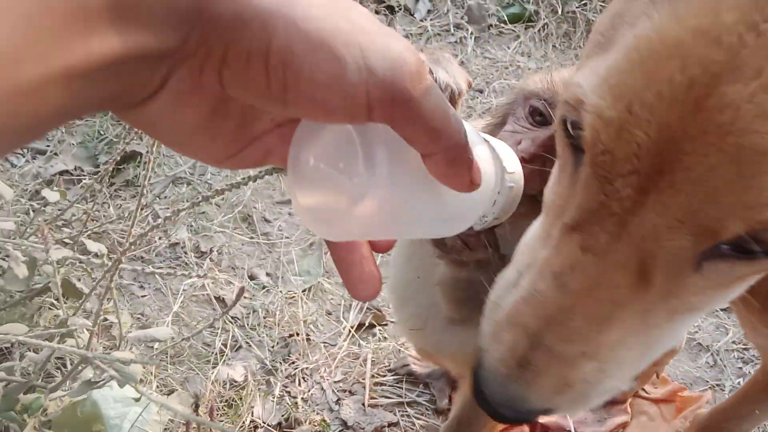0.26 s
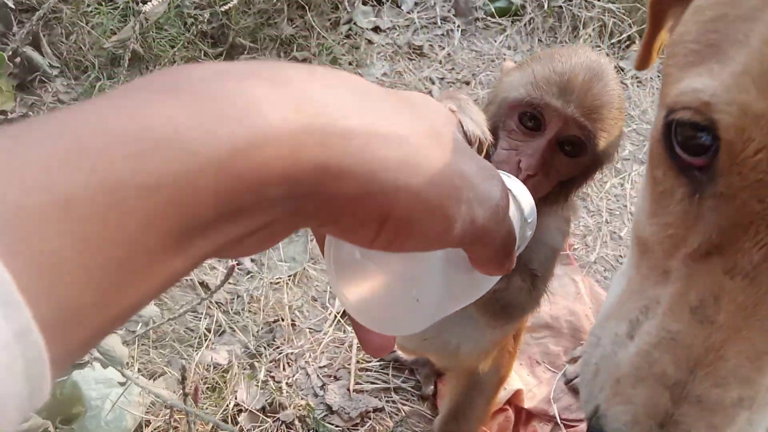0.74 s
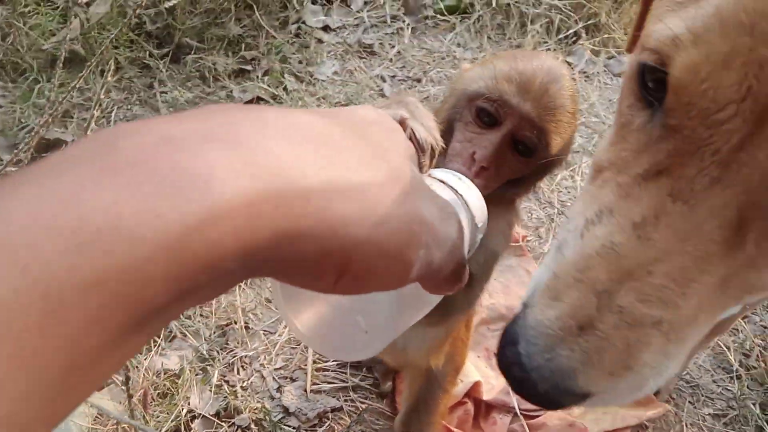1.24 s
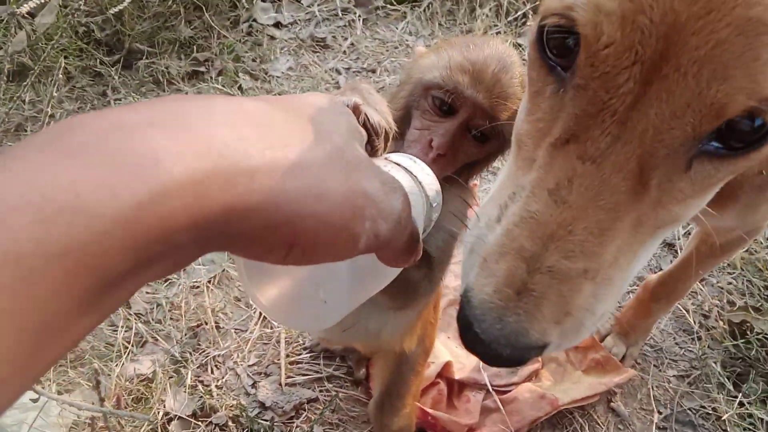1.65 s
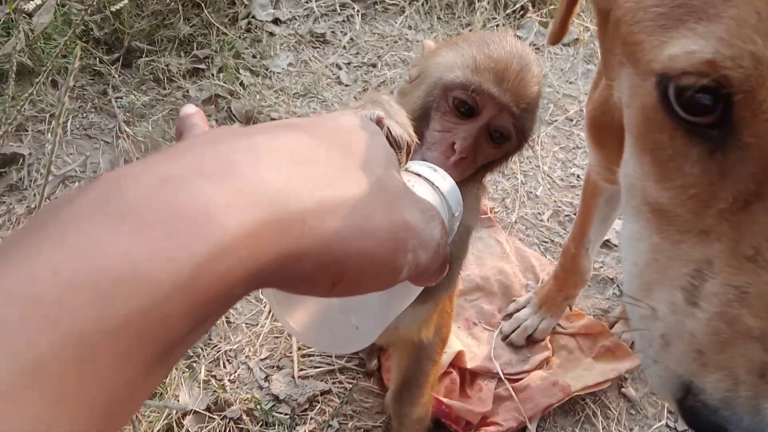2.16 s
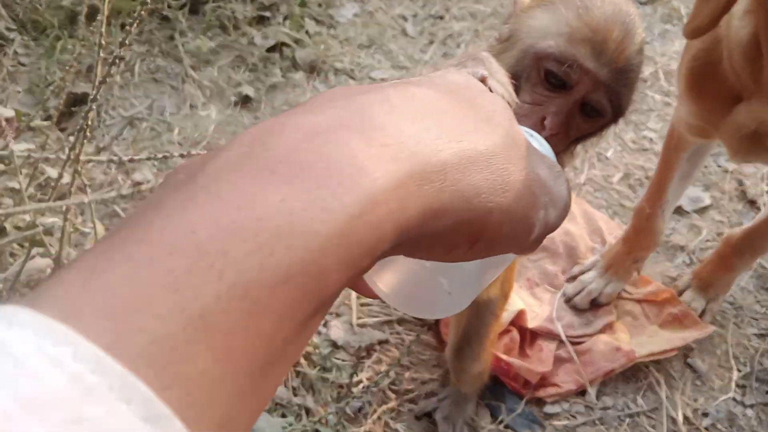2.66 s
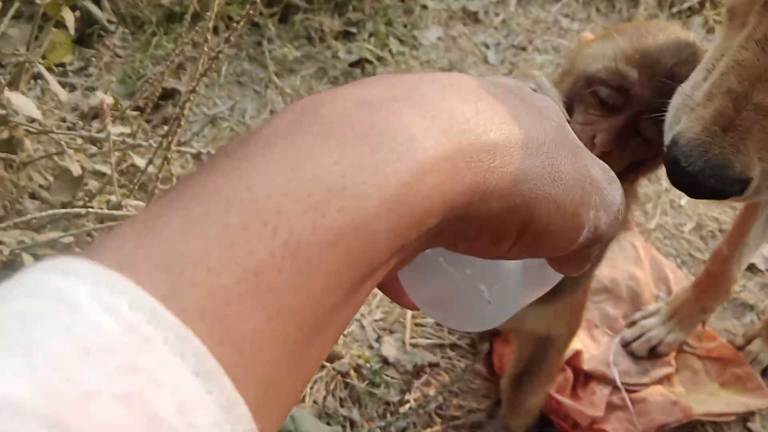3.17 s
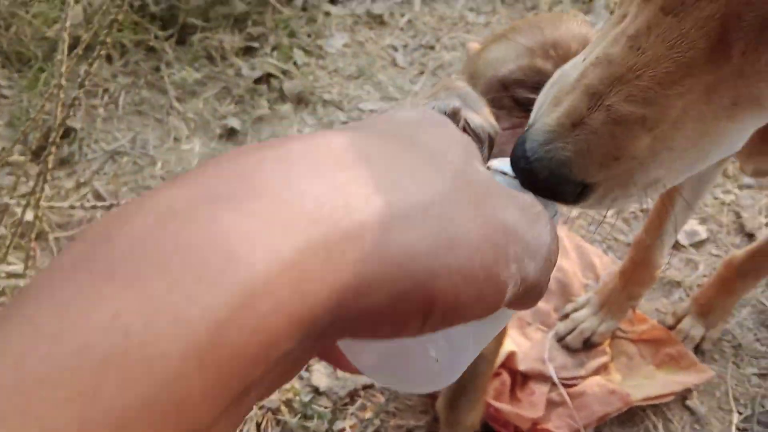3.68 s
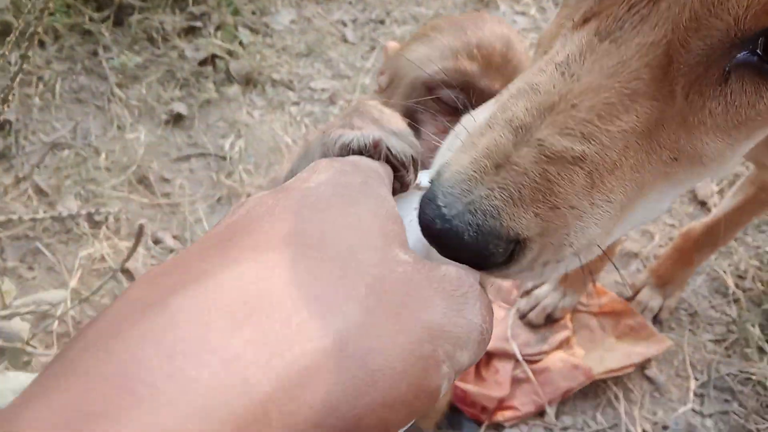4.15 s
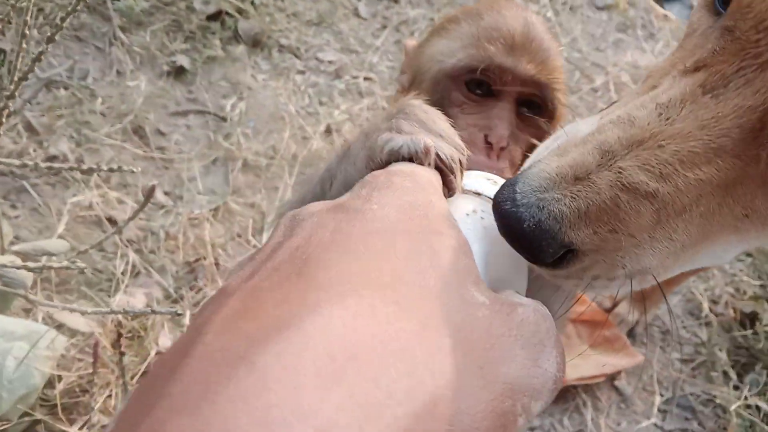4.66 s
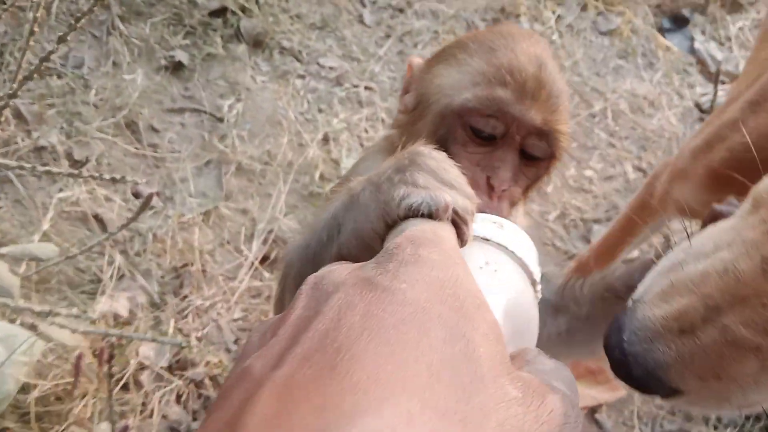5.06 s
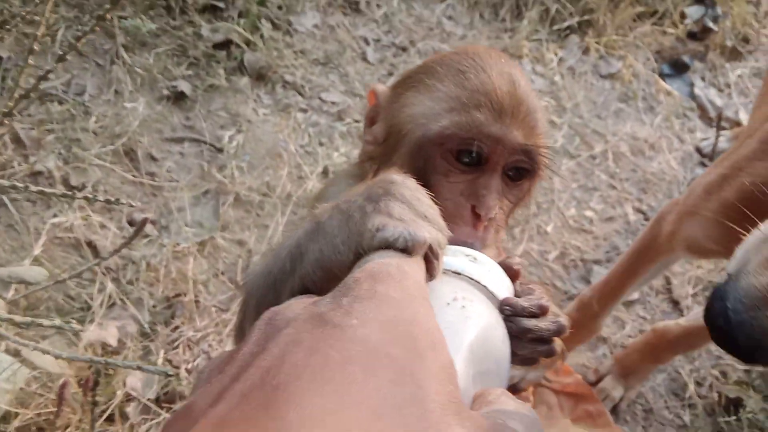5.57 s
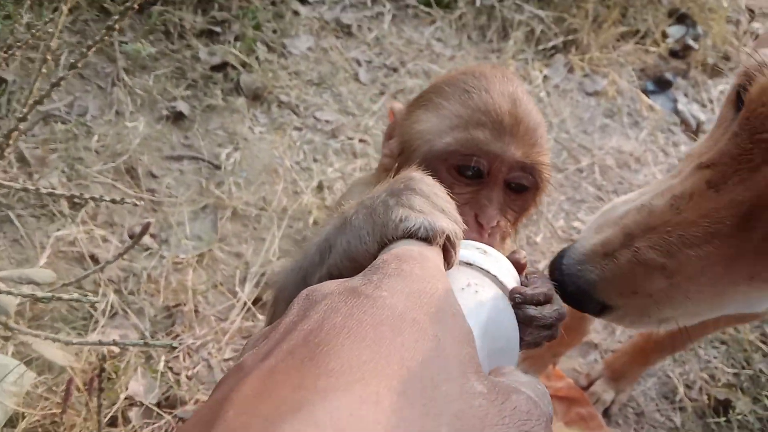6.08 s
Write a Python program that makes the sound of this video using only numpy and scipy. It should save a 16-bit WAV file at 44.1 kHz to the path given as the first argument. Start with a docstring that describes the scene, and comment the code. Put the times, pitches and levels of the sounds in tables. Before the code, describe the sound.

Rasping, chirping birds call over each other in a quiet rural yard as a young monkey and dog nuzzle a bottle with faint clicks and smacks.

```python
"""Rasping chatter and a hissing scold come first: small birds squabble in bushes round a quiet farmyard.
Fluttering tones make the rasps, swinging tones the warbles, sliding tones the whistles, noise the scolds.
Far off, blurred chirps, noise and a thin whine swell and sink over quiet air and insects.
Close by, a young monkey and a dog nuzzle a plastic bottle: short ringing bursts of noise tick and smack."""
import sys
import numpy as np
from scipy import signal
from scipy.io import wavfile

SR = 44100
rng = np.random.default_rng(int(sys.argv[2]) if len(sys.argv) > 2 else 0)


def log_audio(samples):
    """Write samples as a 16-bit WAV file to the path given in sys.argv[1]."""
    # one column per channel
    frames = np.atleast_2d(samples).T
    # limit to full scale, then quantise
    limited = np.clip(frames, -1, 1)
    pcm = np.round(limited * 32767).astype(np.int16)
    wavfile.write(sys.argv[1], SR, pcm)


N = 278698
TIME = np.arange(N) / SR

# shared by several kinds of call
ATTACK_S, ATTACK_SHARE, RELEASE_S = 0.0024, 0.042, .005   # opening also takes this share of the call's length
FLUTTER_JITTER = 0.25   # unevenness of the flutter rate, as a share
CALL_ARCH = .035   # the ends of a rasp or scold lie this share of the pitch lower


def from_db(db):
    """Turn decibels into a plain multiplier."""
    return np.exp(np.asarray(db) * (np.log(10) / 20))


def rms_one(x):
    """Scale a sound to an rms (average strength) of 1."""
    return x / np.sqrt(np.mean(x ** 2) + 1e-20)


def in_time(rows):
    """Each column of a curve, at every sample."""
    s, *columns = np.transpose(rows)
    return [np.interp(TIME, s, c) for c in columns]


def add(out, start, sound):
    """Mix a sound in at a time; what falls outside is lost."""
    at = int(round(start * SR))
    first, last = max(at, 0), min(at + len(sound), N)
    if last > first:
        out[first:last] += sound[first - at:last - at]


def wander(rate, count):
    """A random curve joining `rate` new chance values a second by straight lines; spread about 1."""
    position = np.arange(count) * (rate / SR)
    return 1.22 * np.interp(position, np.arange(4096), rng.standard_normal(4096))


def turns(hz):
    """The phase of an oscillator that follows a pitch curve."""
    return 2 * np.pi * np.cumsum(hz) / SR


def glide(count, first, middle, last):
    """A smooth pitch arc through three points."""
    return np.polyval(np.polyfit([0, .5, 1], [first, middle, last], 2), np.linspace(0, 1, count))


def slide(count, hz, slide_hz, arch):
    """A pitch that slides through `hz`, with both ends lowered by the share `arch`."""
    ends = hz * (1 - arch)
    return glide(count, ends - slide_hz / 2, hz, ends + slide_hz / 2)


def swell(count, loudest, edge_db):
    """A call opens within milliseconds, grows to its loudest point, fades and closes."""
    u, length = np.linspace(0, 1, count), count / SR
    attack = ATTACK_S + ATTACK_SHARE * length
    opening = np.clip(np.minimum(u / attack, (1 - u) / RELEASE_S) * length, 0, 1)
    peak = np.clip(loudest, .05, .95)
    return opening * from_db(np.interp(u, [0, peak, 1], [edge_db, 0, edge_db]))


def resonate(x, hz, width_hz):
    """A resonance, which lets through the sound round one pitch, with gain 1 on top."""
    r = np.exp(-np.pi * width_hz / SR)
    feedback = [1, -2 * r * np.cos(2 * np.pi * hz / SR), r * r]
    return signal.lfilter(np.array([1, 0, -1]) * (1 - r * r) / 2, feedback, x)


def resonate_twice(x, hz, width_hz):
    """The same resonance two times over, for steeper sides."""
    return resonate(resonate(x, hz, width_hz), hz, width_hz)


def low_pass(x, hz, order=2):
    """Take away the treble above a pitch."""
    return signal.sosfilt(signal.butter(order, min(hz, SR / 2 - 1), fs=SR, output="sos"), x)


def banded_noise(spectrum, patchy_db, rate):
    """Third-octave bands of noise, each swelling and sinking by itself; rms 1."""
    out, edges = 0, 25 * 2 ** (np.arange(29) / 3)
    white, (hz, db) = rng.standard_normal((2, N)), np.transpose(spectrum)
    for k, (low, high) in enumerate(zip(edges, edges[1:])):
        if high > hz[0] and low < hz[-1]:
            level = np.interp(np.log(low * high) / 2, np.log(hz), db)
            band_filter = signal.butter(3, [low, high], "band", fs=SR, output="sos")
            band = signal.sosfilt(band_filter, white[k % 2])   # neighbours use different noise
            out = out + band * from_db(level + patchy_db * wander(rate, N))
    return rms_one(out)


def yard(x, t60, echo_db):
    """The ground returns one quick echo; leaves, trunks and walls scatter a thin, dull tail."""
    t = TIME[:SR]
    sparse = rng.standard_normal(SR) * (rng.random(SR) < .06)
    echoes = low_pass(sparse * from_db(-60 * t / t60) * (t > .004), 7700)   # t60: seconds to fade 60 dB
    ground = 0.17 * np.interp(TIME - .0034, TIME, x, left=0)
    tail = signal.fftconvolve(x, echoes / np.linalg.norm(echoes))[:N]
    return x + ground + from_db(echo_db) * tail


# tone colour of the air: (pitch [Hz], relative level per Hz [dB])
AIR_SPECTRUM = [(25, -26), (45, -12.5), (65, 0), (130, -1.5), (230, -9), (340, -6), (520, -14), (900, -12),
                (1600, -10), (3000, -15.5), (4500, -40)]
# faint shrill insect bands: (pitch [Hz], relative level [dB])
INSECT_BANDS = [(5520, -4.5), (6080, 0), (7020, -5.5)]
TOP_HISS_HZ, TOP_HISS_WIDTH_HZ, TOP_HISS_DB = 15500, 1300, -91   # a thin, steady hiss at the very top


def stillness():
    """Noise shaped into low, uneven air, steady far insects and very faint hiss."""
    air = from_db(-67.5) * banded_noise(AIR_SPECTRUM, patchy_db=5.0, rate=20)
    white = rng.standard_normal((2, N))
    insects = rms_one(sum(from_db(db) * resonate_twice(white[0], hz, 380) for hz, db in INSECT_BANDS))
    top = rms_one(resonate_twice(white[0], TOP_HISS_HZ, TOP_HISS_WIDTH_HZ))
    return air + from_db(-79.5) * insects + from_db(-89.0) * white[1] + from_db(TOP_HISS_DB) * top


def far_chirps(count):
    """Many small arcs at random pitches and moments, each with a weak octave; rms 1."""
    out = np.zeros(N)
    for when, size, height, slope, strength in rng.random((count, 5)):
        length = int((.04 + .09 * size) * SR)
        hz = 2250 + 1900 * height ** 1.5
        arc = glide(length, hz * (.92 + .2 * slope), hz, hz * .96)
        phase = turns(arc * (1 + .012 * wander(500, length)))
        tone = np.sin(phase) + .15 * np.sin(2 * phase)
        add(out, when * N / SR, from_db(6 * strength) * swell(length, .4, edge_db=-10) * tone)
    return rms_one(low_pass(out, 6500, order=8))


def blurred_tone(hz, width_hz):
    """A tone that drifts a little and fades in and out on its long path; rms 1."""
    fading = wander(width_hz, N) + 1j * wander(width_hz, N)
    phase = turns(hz * (1 + .011 * wander(9, N)))
    return rms_one(np.real(fading * np.exp(1j * phase)))


# loudness of the far flock, before the trims below: (time [s], chatter level [dB], hiss level [dB])
FLOCK_LEVELS = [(0.0, -44, -36), (0.21, -54.5, -81), (0.46, -56.5, -53), (0.63, -49.5, -47),
                (.8, -52.5, -59), (1.07, -54, -49), (1.23, -53, -63), (1.49, -66.5, -57.5),
                (2.16, -65, -77), (2.31, -52, -74), (2.46, -75, -75.5), (2.72, -63, -58.5),
                (2.94, -56.5, -47.5), (3.13, -58, -54), (3.7, -62, -69), (4.03, -61.5, -52.5),
                (4.66, -54, -81), (5.3, -55, -50), (5.72, -46.5, -43), (6.12, -54, -50), (6.32, -50, -46)]
CHATTER_DB, HISS_DB = -3, -8   # trims of its two layers
# tone colours of the flock's chatter and hiss: (pitch [Hz], relative level per Hz [dB])
CHATTER_SPECTRUM = [(900, -40.5), (1500, -8.5), (1850, 5.5), (2300, 6), (3000, 3.5), (3700, -9), (4600, 3),
                    (7000, -54.5)]
HISS_SPECTRUM = [(2700, -11), (3900, 17.5), (4700, 2), (5600, -0.5), (6300, -9), (7200, -30), (8200, -29)]
# line of the distant whine: (time [s], level [dB])
WHINE_LEVELS = [(0.0, -72.5), (0.45, -65.5), (0.58, -71), (0.84, -63.5), (1.28, -73.5), (1.94, -76.5),
                (3.2, -71.5), (3.7, -62), (4.1, -61), (4.9, -62), (5.12, -72.5), (6.32, -62.5)]
WHINE_HZ, WHINE_SKIRT_HZ = 1254.5, 1378   # its line, and the blur above it
WHINE_EVEN_DB = -51   # level at which line and blur would be equal
# faint calls from afar: (start [s], length [s], pitch [Hz], slide [Hz], middle level [dB])
FAR_CALL_NOTES = [(0.047, 0.57, 681, -10.5, -71), (1.231, 0.4, 299.4, -120, -68.5),
                  (1.758, 0.45, 898, -38, -71.5), (2.598, 0.27, 1054, -89, -68.5),
                  (4.181, 1, 314.3, -4.5, -70.5), (5.115, 0.28, 783, 71, -73.5)]


def distance():
    """The far flock, blurred by echoes, a wavering whine and a few long, faint calls."""
    chatter_db, hiss_db = in_time(FLOCK_LEVELS)
    blur = banded_noise(CHATTER_SPECTRUM, patchy_db=2, rate=25)
    chirps = rms_one(yard(far_chirps(count=170), t60=.5, echo_db=-3))
    out = from_db(chatter_db + CHATTER_DB) * (.6 * blur + .75 * chirps)
    out += from_db(hiss_db + HISS_DB) * banded_noise(HISS_SPECTRUM, patchy_db=2.2, rate=30)
    whine = from_db(in_time(WHINE_LEVELS)[0])
    skirt = whine / from_db(WHINE_EVEN_DB)   # the whine broadens upwards as it swells
    out += whine * (blurred_tone(WHINE_HZ, 140) + skirt * blurred_tone(WHINE_SKIRT_HZ, 220))
    for start, length, hz, slide_hz, db in FAR_CALL_NOTES:
        count = int(length * SR)
        tone = np.sin(turns(slide(count, hz, slide_hz, 0) * (1 + .025 * wander(120, count))))
        add(out, start, from_db(db + 3 * wander(40, count)) * np.hanning(count) ** .5 * tone)
    return out


# dry grass and the plastic bottle tick: (time [s], peak level [dB], ring pitch [Hz])
TICK_EVENTS = [(0.3172, -55.5, 8040), (0.4215, -45, 5200), (1.1246, -40, 4940), (1.815, -40, 3250),
               (2.186, -40.5, 4560), (2.735, -51, 4870), (3.94, -62, 8940), (4.5463, -54, 10600),
               (5.512, -53.5, 7640)]
TICK_WIDTH = 0.32   # width of the ring as a share of its pitch
# wet smacks: (time [s], peak level before a lift of 4.5 dB [dB], mouth resonance [Hz])
SMACK_EVENTS = [(0.065, -51, 1240), (0.974, -55.5, 383), (1.138, -59, 1056), (2.183, -48.5, 1280),
                (3.335, -59, 1010), (3.977, -51, 840), (4.514, -50.5, 1154), (4.787, -59.5, 323),
                (5.512, -58, 1170), (5.692, -53, 1130)]
# dry grass shifts: (time of the peak [s], middle level [dB])
RUSTLE_EVENTS = [(2.88, -72), (5.351, -79.5), (6.18, -65.5)]
RUSTLE_RISE_DB_PER_S, RUSTLE_FALL_DB_PER_S = 147, 59
# tone colour of the grass: (pitch [Hz], relative level per Hz [dB])
GRASS_SPECTRUM = [(4000, -2.5), (6000, -12.5), (7800, 16.5), (9500, -11.5), (11500, -18)]


def feeding():
    """Sharp ticks of plastic and straw, smacks ringing in a mouth, and dry grass shifting underfoot."""
    out, t = np.zeros(N), TIME[:SR // 10]
    for s, db, hz in TICK_EVENTS:
        crack = rng.standard_normal(len(t)) * np.exp(-t / 0.0048)
        tick = resonate_twice(crack, hz, TICK_WIDTH * hz)
        add(out, s, from_db(db) * tick / np.abs(tick).max())
    for s, db, hz in SMACK_EVENTS:
        burst = rng.standard_normal(len(t)) * np.exp(-t / 0.014)
        smack = low_pass(resonate(burst, hz, 110), 2700)
        add(out, s, from_db(db + 4.5) * smack / np.abs(smack).max())
    shifts = 0
    for s, db in RUSTLE_EVENTS:
        below_peak_db = np.maximum(RUSTLE_RISE_DB_PER_S * (s - TIME), RUSTLE_FALL_DB_PER_S * (TIME - s))
        shifts = shifts + from_db(db - below_peak_db)
    stirring = shifts * from_db(2.0 * wander(370, N))
    return out + stirring * banded_noise(GRASS_SPECTRUM, patchy_db=3.0, rate=30)


# hissing scolds: (start [s], length [s], centre [Hz], slide [Hz], width [Hz], level [dB])
SCOLD_CALLS = [(-.1, 0.43, 4197, -200, 1130, -58), (0.569, 0.11, 5400, 5, 1190, -54),
               (0.86, 0.032, 5220, -700, 400, -57.5), (0.906, 0.064, 5820, 1588, 506, -59.5),
               (1.035, 0.14, 5340, -7, 650, -53.5), (1.775, 0.18, 4300, -200, 700, -63),
               (2.728, 0.13, 5160, -300, 1860, -55), (2.791, 0.26, 3670, 454, 1220, -50.5),
               (3.018, 0.14, 4040, -100, 895, -55), (4.193, 0.059, 5220, 4, 705, -59),
               (4.267, .07, 5750, 1203.5, 653, -52.5), (4.332, 0.053, 5760, -900, 650, -57.5),
               (4.463, 0.08, 5280, -500, 503, -61), (5.309, 0.069, 4930, 392, 500, -51.5),
               (5.236, 0.32, 3964, 100, 1220, -53), (4.741, 0.057, 6140, 5, 350, -62.5)]
SCOLD_LOUDEST, SCOLD_FLUTTER_HZ, SCOLD_CHOP = 0.36, 277.8, 0.62   # loudest point 0-1; flutter rate, depth 0-1


def scolds():
    """Toneless, fluttering hisses in one resonance that slides as the beak opens or closes."""
    out = np.zeros(N)
    for start, length, hz, slide_hz, width_hz, db in SCOLD_CALLS:
        count = int(length * SR)
        jet = low_pass(rng.standard_normal((2, SR)), width_hz / 2)[:, -count:]
        phase = turns(slide(count, hz, slide_hz, CALL_ARCH))
        flutter = turns(SCOLD_FLUTTER_HZ * (1 + FLUTTER_JITTER * wander(SCOLD_FLUTTER_HZ, count)))
        gate = 1 + SCOLD_CHOP * np.cos(flutter)
        # two slow noises on a cosine and a sine make a band of noise round the sliding centre
        hiss = rms_one(gate * (jet[0] * np.cos(phase) + jet[1] * np.sin(phase)))
        add(out, start, from_db(db) * swell(count, SCOLD_LOUDEST, edge_db=-4.0) * hiss)
    return out


# whistles: (start [s], length [s], pitch [Hz], slide [Hz], level [dB], remoteness [0-1])
WHISTLE_CALLS = [ (2.081, 0.1, 3710, 60.5, -61, 1), (2.335, 0.013, 3550, 54, -47, 0.2),
                 (2.443, 0.036, 2358, -480, -45, 0), (2.855, 0.16, 2913, -6.5, -51, 0.16),
                 (3.328, 0.21, 3737, -58, -59.5, 0.92), (3.356, 0.085, 5880, -250, -72, 1),
                 (3.822, 0.12, 4350, -86.5, -62.5, 0.9), (3.439, 0.091, 2296, -250, -44, 0.22),
                 (3.747, 0.083, 3244, -620, -52.5, 1), (3.822, 0.15, 2911, -160, -47.5, 0.72),
                 (4.501, 0.022, 2450, -300, -38, 0.03), (4.519, 0.074, 2248, -300, -53, 0.35),
                 (4.598, 0.13, 3863, -37, -59, 0.5), (4.858, 0.041, 3523, 28, -40.5, 0.2),
                 (4.901, 0.092, 3394, -62, -45, 0.7), (4.99, 0.35, 3470, -2, -59.5, 0.9)]
# overtone of a whistle, against its main tone: (pitch of the whistle [Hz], level [dB])
OCTAVE_LEVELS = [(2400, -39.5), (2900, -16), (3600, -23)]
WHISTLE_SAG, WHISTLE_LOUDEST = 0.008, 0.32   # both ends lie this share higher; loudest point 0-1
WHISTLE_WAVER, WHISTLE_FLICKER_DB = 0.028, -1   # most remote: pitch waver (share), change of level flicker


def whistles():
    """Steady blowing gives a nearly pure gliding note; with remoteness its pitch wavers and it echoes more."""
    near, far = np.zeros((2, N))
    for start, length, hz, slide_hz, db, remote in WHISTLE_CALLS:
        count, remote = int(length * SR), np.clip(remote, 0, 1)
        waver = 1 + remote * WHISTLE_WAVER * wander(492.7, count)
        phase = turns(slide(count, hz, slide_hz, -WHISTLE_SAG) * waver)
        octave_db = np.interp(hz, *np.transpose(OCTAVE_LEVELS))
        flicker = from_db((2.5 + remote * WHISTLE_FLICKER_DB) * wander(147, count))
        tone = (np.sin(phase) + from_db(octave_db) * np.sin(2 * phase)) * flicker
        note = from_db(db) * swell(count, WHISTLE_LOUDEST, edge_db=-2.0) * rms_one(tone)
        add(near, start, (1 - remote) * note)
        add(far, start, remote * note)
    return near, far


# warbles: (start [s], length [s], pitch [Hz], slide [Hz], level [dB],
#           swings a second [Hz], swing [Hz], cracked side tones [dB])
WARBLE_CALLS = [(0.389, 0.046, 4640, 895, -52, 330, 300, -28),
                (0.449, 0.11, 3940, -480, -46, 180, 150, -18.5),
                (1.072, 0.083, 2252, -82, -46.5, 77, 129, -23.5),
                (1.736, 0.061, 2482, -250, -40, 118, 200, -28), (2.197, 0.089, 2636, 4, -48, 109, 210, -10),
                (2.342, 0.042, 2557, 0, -45.5, 104, 90, -20),
                (2.391, .055, 2620, 50, -49.5, 81.4, 149, -24),
                (5.637, 0.07, 3396, 189, -45.5, 54, 417, -19),
                (5.697, 0.086, 3570, -150, -43.5, 98, 230, -15)]
WARBLE_ARCH, WARBLE_LOUDEST = 0.0305, .62   # both ends lie this share lower; loudest point 0-1
WARBLE_THROB = 0.16   # share by which each upswing fades
WARBLE_LOWER_DB = -1.5   # of the two cracked side tones, the lower against the upper


def warbles():
    """The pitch swings fast round an arc and fades on upswings; cracks add tones at 0.5 and 1.5 times it."""
    out = np.zeros(N)
    for start, length, hz, slide_hz, db, rate, swing_hz, cracked_db in WARBLE_CALLS:
        count = int(length * SR)
        swing = np.cos(turns(rate * (1 + 0.084 * wander(rate, count))))
        arc = slide(count, hz, slide_hz, WARBLE_ARCH) * (1 + 0.018 * wander(893, count))
        phase = turns(arc + swing_hz * swing)
        cracks = np.sin(phase + phase / 2) + from_db(WARBLE_LOWER_DB) * np.sin(phase / 2)
        cracks = cracks * (1 + 0.33 * wander(700, count))
        tone = (1 - WARBLE_THROB * swing) * (np.sin(phase) + from_db(cracked_db) * cracks)
        add(out, start, from_db(db) * swell(count, WARBLE_LOUDEST, edge_db=-3) * rms_one(tone))
    return out


# rasping calls: (start [s], length [s], pitch [Hz], slide [Hz], tone level [dB],
#                 harshness against the tone, before the trims below [dB], loudest point [0-1])
RASP_CALLS = [ (-.04, 0.12, 2420, -280, -44.5, -9, 0.4), (-.03, 0.11, 4000, -200, -42.5, -10.5, 0.6),
              (0.415, 0.062, 2610, -150, -53, 3.5, 0), (0.555, 0.16, 2907, -150, -43, -4, 0.61),
              (0.703, 0.031, 2274, 501, -45, -7, 0.8), (0.724, 0.038, 3244, 611, -42.5, -18, 0.3),
              (0.788, 0.034, 2750, -350, -45.5, -15, 0.4), (0.841, 0.043, 2980, -350, -37, -36, 1),
              (0.881, 0.017, 2854, -200, -43, -27, 0.2), (0.897, 0.029, 3250, 700, -44.5, -18.5, 0.6),
              (.942, 0.12, 3166, 334, -55, -4.5, 0.5), (1.005, 0.079, 1790, 598, -55.5, 1.5, 0.77),
              (1.06, 0.086, 3140, -100, -48.5, -14, 0.4), (1.149, 0.03, 2840, -250, -39, -16.5, 0.4),
              (1.167, 0.027, 2750, -200, -49.5, -20, 0.2), (1.191, 0.029, 3005, 805, -51, 1, 0.2),
              (1.376, 0.028, 2710, -300, -50.5, -8, 0.4), (1.694, 0.099, 2565, -59, -47, 3, 0.26),
              (1.715, 0.082, 3560, -60, -49.5, -31, 0.7), (2.175, 0.124, 2602, 50, -49.5, 1, 0),
              (2.391, 0.073, 3280, -200, -56.5, -31.5, 0.9), (2.746, 0.077, 2422, 436, -44, -5, 0.8),
              (2.791, 0.087, 2545, -150, -41.5, -11.5, 0.3), (3.34, 0.027, 2554, -100, -53, -3.5, .6),
              (3.421, 0.021, 2580, -310, -48.5, -12, 0.3), (3.859, 0.026, 2370, -350, -48.5, -30, .25),
              (3.91, 0.036, 2440, -380, -49.5, -5, 0.2), (4.175, 0.072, 2796, 251, -47, -12, 0.37),
              (4.233, 0.0538, 2836, 363, -45.5, -7.5, 0), (4.36, .043, 2760, -200, -42, -14, 0.4),
              (4.405, 0.062, 2555, -450, -49.5, -6, 0.4), (4.492, 0.025, 2846, -400, -44, -17, 0.3),
              (4.725, 0.087, 2440, -100, -47, -2, 0.47), (4.801, 0.047, 2680, -550, -43.5, -10.5, 0),
              (4.902, 0.11, 2893, -550, -44.5, -22, 0.4), (4.963, 0.066, 4150, -1200, -47.5, -16, 0.6),
              (5.309, 0.12, 2528, 119, -45.5, -17, 1), (5.787, 0.054, 2620, -700, -47, -13, 0.4),
              (5.852, 0.12, 2337, 236, -44.5, -5.5, 0.26), (6.144, 0.061, 3980, -450, -48, -5.5, 0.4),
              (6.17, 0.032, 2530, 499, -42, -8, 0.6), (6.228, 0.065, 2546, -8, -47, -1, 0.7)]
# the syrinx (a bird's voice box) is least stable in mid range: (pitch [Hz], roughness [0-1])
ROUGHNESS_BY_PITCH = [(2300, 0.49), (2550, 0.51), (2850, 0.77), (3500, 0.55)]
# side bands of the second membrane: (order [steps], relative level [dB])
BUZZ_SIDE_BANDS = [(-1, -8.5), (1, 5), (2, -0.5), (3, -3.5), (4, -12.5)]
# resonances of the beak, each passed twice: (pitch [Hz], width [Hz], level [dB])
BEAK_RESONANCES = [(2300, 510, 8), (3470, 2400, -15), (5600, 9900, -10.5), (1676, 42, 6.5)]
FLUTTER_SHARE = .098   # flutter rate as a share of the pitch
RASP_EDGE_DB, RASP_SWELL_DB_PER_S = 0, 52.5   # the longer a call, the softer its two ends
BUZZ_DB, BREATH_DB = -3, -6.5   # trims of the side bands and hiss of a harsh call
HARSH_FOLLOWS = 1.13   # harshness grows as this power of the call's swell


def rasps():
    """The syrinx flutters: each beat chops and bends the tone; a second membrane adds buzz and hiss."""
    out = np.zeros(N)
    for start, length, call_hz, slide_hz, db, harsh_db, loudest in RASP_CALLS:
        count, flutter_hz = int(length * SR), FLUTTER_SHARE * call_hz
        rough = np.clip(np.interp(call_hz, *np.transpose(ROUGHNESS_BY_PITCH)), 0, 1)
        beat = turns(flutter_hz * (1 + FLUTTER_JITTER * wander(flutter_hz, count)))
        chop = 1 + min(.2 + rough, 1) * np.cos(beat)
        gate = chop * from_db(1.8 * wander(flutter_hz, count))
        bend = rough * (.12 * np.sin(beat) + .04 * wander(900, count))
        pitch = slide(count, call_hz, slide_hz, CALL_ARCH)
        phase, steadier = turns(pitch * (1 + bend)), turns(pitch * (1 + bend / 2))
        tone = rms_one(gate * (np.sin(phase) + from_db(-35.0) * np.sin(2 * phase)))
        # the second membrane beats at 0.41 of the pitch and sets the spacing of the side bands
        second = turns(pitch * .41 * (1 + .035 * wander(1200, count)))
        bands = sum(from_db(g) * np.sin(steadier + round(k) * second) for k, g in BUZZ_SIDE_BANDS)
        buzz = rms_one(np.sqrt(gate) * bands)
        jet = gate * rng.standard_normal(SR)[:count]
        hiss = rms_one(sum(from_db(g) * resonate_twice(jet, hz, w) for hz, w, g in BEAK_RESONANCES))
        harsh = from_db(harsh_db) * (from_db(BUZZ_DB) * buzz + from_db(BREATH_DB) * hiss)
        effort = swell(count, loudest, edge_db=RASP_EDGE_DB - RASP_SWELL_DB_PER_S * length)
        add(out, start, from_db(db) * (effort * tone + effort ** HARSH_FOLLOWS * harsh))
    return out


def scene():
    """Near and far birds share the yard; air and foliage take the top off them all."""
    near, far = whistles()
    near_birds = yard(rasps() + warbles() + scolds() + near, t60=0.41, echo_db=-10.5)
    birds = near_birds + yard(far, t60=1.0, echo_db=-5.0)
    around = low_pass(birds, 6790, order=10) + distance()
    # an arm and the animals reflect into the microphone over short paths that shift as they move
    glances = 0
    for lag_s in (.0013, .0022):
        shifting_lag = lag_s * (1 + .1 * wander(2, N))
        glances = glances + np.interp(TIME - shifting_lag, TIME, around)
    return (.97 * around + .17 * glances + feeding() + stillness())[None]


# peaks and dips of the microphone, one after another: (pitch [Hz], width [Hz], level [dB])
MICROPHONE_PEAKS = [(4760, 1600, -2), (5400, 670, 3), (6660, 340, -20.5)]
CUTOFF_HZ = 15800


def record(dry):
    """The microphone port colours the treble; the top is cut steeply."""
    for hz, width_hz, db in MICROPHONE_PEAKS:
        dry = dry + (from_db(db) - 1) * resonate(dry, hz, width_hz)
    return signal.sosfilt(signal.ellip(10, .1, 80, CUTOFF_HZ, fs=SR, output="sos"), dry)


dry = scene()
out = record(dry)
log_audio(out)
```